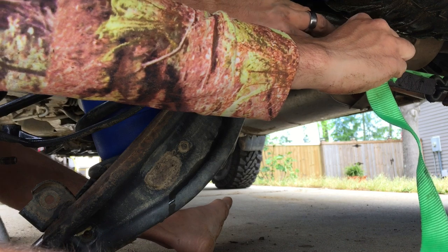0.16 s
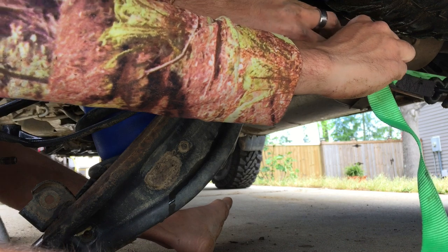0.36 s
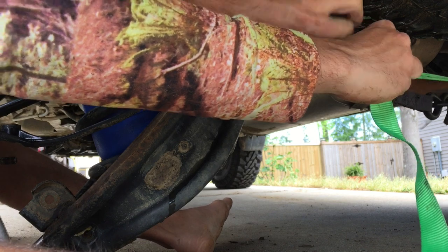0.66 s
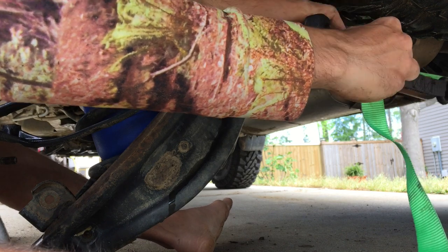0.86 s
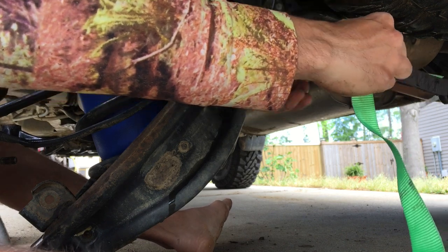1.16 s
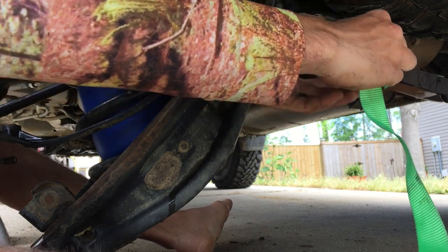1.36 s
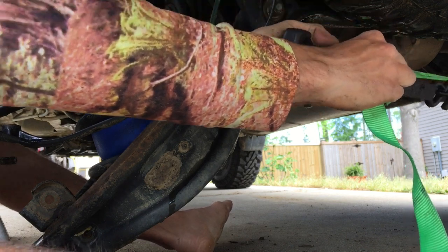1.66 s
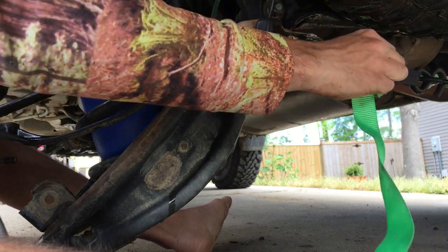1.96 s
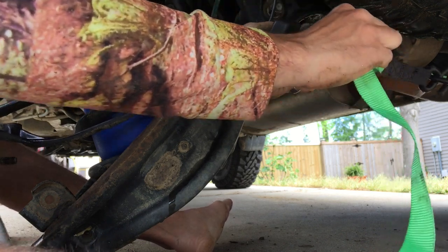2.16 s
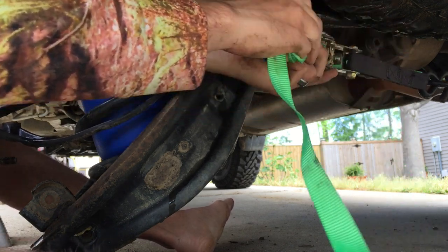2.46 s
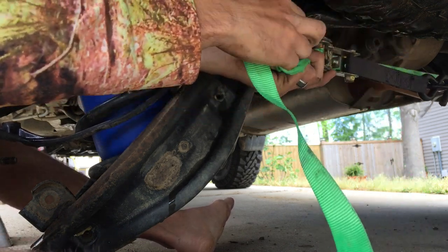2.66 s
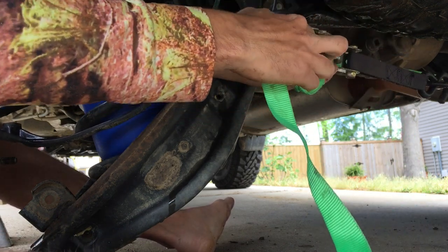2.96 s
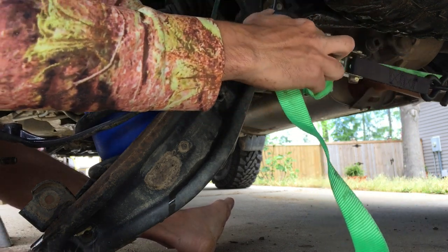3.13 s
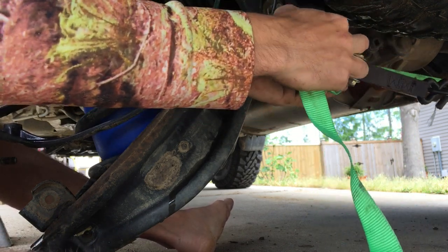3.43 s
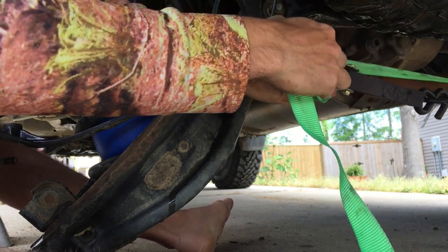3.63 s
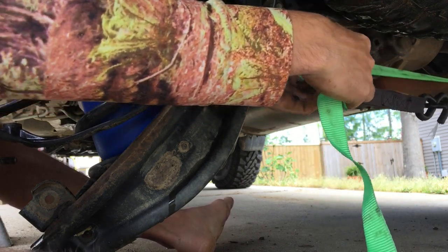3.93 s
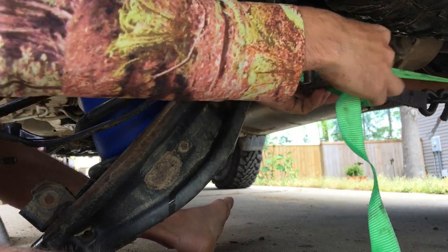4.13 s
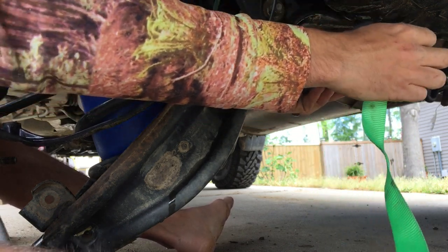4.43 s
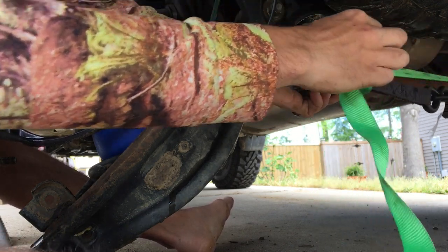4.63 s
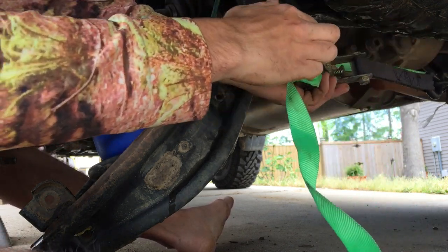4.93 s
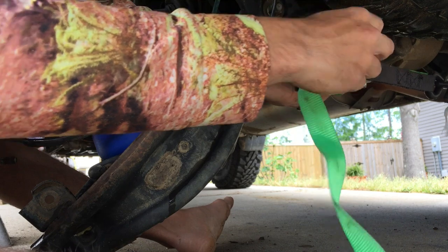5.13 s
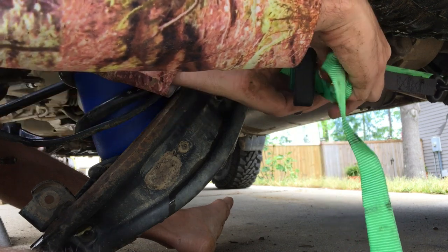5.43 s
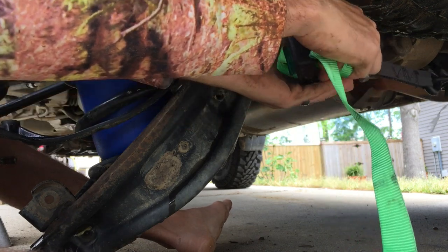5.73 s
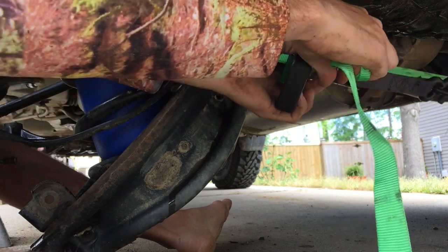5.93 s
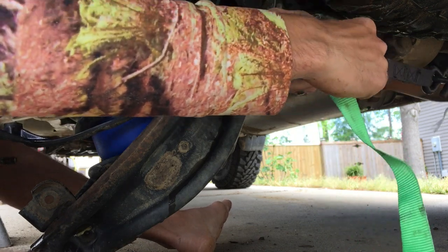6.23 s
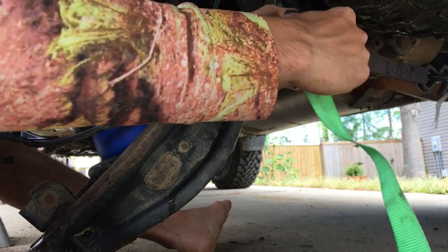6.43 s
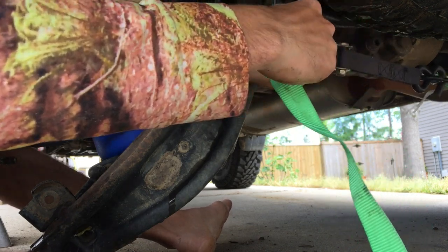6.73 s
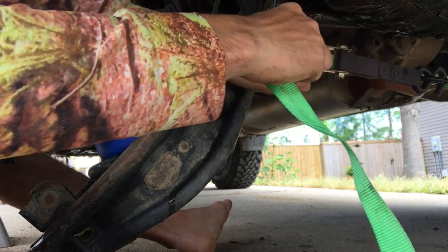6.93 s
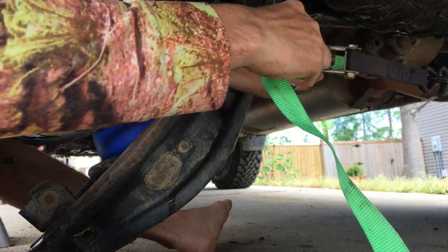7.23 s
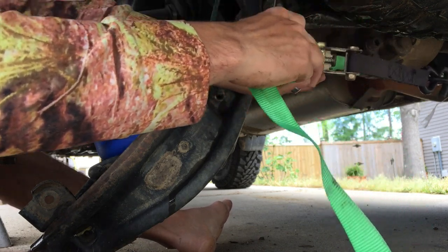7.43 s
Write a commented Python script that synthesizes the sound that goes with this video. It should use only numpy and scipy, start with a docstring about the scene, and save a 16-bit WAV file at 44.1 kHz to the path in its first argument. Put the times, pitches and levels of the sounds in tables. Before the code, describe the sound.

Over a steady low hum in an open garage, webbing rubs lightly as it is fed through a metal ratchet buckle. A short, groaning scuff comes early. Midway the strap creaks softly and the buckle clicks loudly three times, close and nearly dry. A second hollow scuff, small knocks and more rustling follow. A distant bird whistles faintly in the first half, and insects buzz softly later.

```python
"""Ratchet strap in an open garage

Under a vehicle, hands feed webbing through a steel ratchet buckle, whose modes ring as it ticks and
snaps three times. Stick-slip friction makes the webbing rustle and drives a hollow panel in two scuffs.
A fan hums, a thin whine hangs in the air, a bird whistles, insects buzz; a draught sways the microphone."""
import sys
import numpy as np
from scipy import signal
from scipy.fft import rfft, irfft, next_fast_len
from scipy.io import wavfile
from scipy.ndimage import map_coordinates

SR = 44100
rng = np.random.default_rng(int(sys.argv[2]) if len(sys.argv) > 2 else 0)


def int16_out(signal):
    """Quantize to a 16-bit WAV file."""
    q = np.round(np.clip(np.atleast_2d(signal).T, -1, 1) * 32767)
    wavfile.write(sys.argv[1], SR, q.astype(np.int16))


N = 334278

# the spring-loaded pawl snaps home: t/s, level/dB, brightness/(dB per register), favoured f/Hz,
# relative ring/dB, lead of the slip off the tooth/s, relative slip/dB, lever clack/dB
SNAPS = [(4.134, -19.5, -1.5, 3330, 10.5, 0.0013, -13, -22.5),
         (4.372, -15.5, 0.5, 5000, 0.5, 0.0029, -31, -16.5), (4.7526, -18, -0.8, 8400, 14.5, .005, -7, -28)]


def amp(db):
    """Decibels to amplitude ratio."""
    return 10 ** (np.asarray(db) / 20)


def unit(x):
    """Normalise to rms 1."""
    return x / np.sqrt(np.mean(x ** 2) + 1e-20)


def along(points, hz):
    """Interpolate (f/Hz, value) points on a logarithmic frequency axis."""
    f, v = np.transpose(points)
    return np.interp(np.log(hz + 1e-3), np.log(f), v)


def curve(points):
    """Interpolate (t/s, value) points linearly, one value per sample."""
    return np.interp(np.arange(N) / SR, *np.transpose(points))


def wobble(rate):
    """Smooth random modulation with `rate` knots a second."""
    knots = rng.standard_normal(int(N * rate / SR) + 4)
    return map_coordinates(knots, [np.arange(N) * rate / SR])


def filtered(x, response):
    """Linear filtering: multiply the spectrum by a frequency response."""
    m = next_fast_len(len(x) + SR // 4)
    return irfft(rfft(x, m) * response(np.fft.rfftfreq(m, 1 / SR)), m)[:len(x)]


def coloured(x, spectrum):
    """Spectral shaping by (f/Hz, level/dB) points, at rms 1."""
    return unit(filtered(x, lambda hz: amp(along(spectrum, hz))))


def noise(spectrum):
    """Coloured Gaussian noise of rms 1."""
    return coloured(rng.standard_normal(N), spectrum)


def slips(rate, size=N):
    """A Poisson train of `rate` impulses a second, at rms 1."""
    return unit((rng.random(size) < rate / SR) * rng.standard_normal(size))


def phase(hz):
    """Phase as the time integral of frequency."""
    return 2 * np.pi * np.cumsum(hz) / SR


def add(track, s, sound):
    """Superpose a sound on the track at time s."""
    part = track[max(round(s * SR), 0):][:len(sound)]
    part += sound[:len(part)]


def echo(x, decay, size):
    """Reverberation: convolution with a diffuse tail of unit energy, decaying by (f/Hz, T60/s) points."""
    hz, t, z = signal.stft(rng.standard_normal(size), SR, nperseg=128)
    tail = signal.istft(z * amp(-60 * t / along(decay, hz)[:, None]), SR, nperseg=128)[1]
    tail = np.pad(tail / np.linalg.norm(tail), (SR // 500, 0))
    return signal.fftconvolve(x, tail)[:len(x)]


def resonances(modes, f):
    """Complex response of damped resonators (f/Hz, bandwidth/Hz, level/dB), alternating in sign."""
    return sum((-1) ** k * amp(db) * 1j * f * width / (hz * hz - f * f + 1j * f * width)
               for k, (hz, width, db) in enumerate(modes))


def focus(f, hz, db_per_octave):
    """A response that falls at a constant slope on both sides of hz."""
    return amp(-db_per_octave * np.abs(np.log2((f + 1) / hz)))


def fan(waver_hz=2.4):
    """Partials of the fan and other machines hum under slight amplitude and frequency modulation."""
    partials = [(62.6, -66.5), (128.9, -58.5), (146.7, -59), (223, -70.5), (271, -72), (371.8, -68),
                (446.6, -69), (747, -75.5)]  # f/Hz, level/dB
    swell = [(0, -5.5), (2.5, 0), (6.5, 4.5), (7.58, 2)]  # slow swell, in full on the higher partials: t/s, level/dB
    swell_db, out = curve(swell), np.zeros(N)
    for hz, db in partials:
        level_db = db + swell_db * min(hz / 370, 1) ** 2 + 2.3 * wobble(5.1)
        out += amp(level_db) * np.sin(phase(hz + waver_hz * wobble(9)))
    return np.sqrt(2) * out


def whine(hz=3494, octave_db=-70):
    """An electrical tone of two harmonics: the fundamental swells and ebbs, the octave only wavers."""
    fundamental = [(2.35, -71), (2.55, -65.5), (2.75, -70.5), (5.3, -74), (5.5, -66.5), (6.6, -65.5),
                   (7.58, -71)]  # t/s, level/dB
    turn = phase(hz + 1.5 * wobble(6))
    harmonics = [(1, curve(fundamental)), (2, octave_db)]
    return np.sqrt(2) * sum(amp(db + 2 * wobble(7)) * np.sin(k * turn) for k, db in harmonics)


def off_arm(x, delay_s=.00125, sway_s=.00007, reflection=.47):
    """Comb filtering: a sound interferes with its reflection from the moving arm; rms 1."""
    lag = (delay_s + sway_s * wobble(2)) * SR
    return unit(x + reflection * map_coordinates(x, [np.arange(N) - lag]))


def insects(floor_db=-64, half_width_s=1):
    """Incoherent sources add in power: the chorus swells and ebbs above a constant floor."""
    crests = [(1.5, -73), (3.801, -67.5), (6.55, -59)]  # swells of the chorus: t/s, level/dB
    buzz = [(2000, -23), (4000, -11.5), (5800, 1.5), (7000, 4.5), (8200, 2.5), (10000, -5.5), (13000, -12),
            (16000, -46)]  # spectral density: f/Hz, relative level/dB
    t = np.arange(N) / SR
    swell_power = sum((amp(db) * np.exp(-((t - s) / half_width_s) ** 2)) ** 2 for s, db in crests)
    level_db = 10 * np.log10(amp(floor_db) ** 2 + swell_power)
    return amp(level_db + 1.2 * wobble(11)) * off_arm(noise(buzz))


def air(ambient_db=-48, draught_db=-28.5):
    """Broadband outdoor and fan noise, with the infrasonic pressure fluctuation of a draught."""
    # spectral densities: f/Hz, relative level/dB
    ambient = [(15, 9.5), (30, 4), (90, 1.5), (170, -2.5), (230, -9), (420, -12.5), (650, -19.5),
               (1200, -21.5), (1800, -21), (4000, -25.5), (7500, -31), (11000, -39), (16000, -42.5)]
    draught = [(.5, -12.5), (2, 9.5), (4, 3), (8, -10.5), (20, -63), (40, -62), (100, -120)]
    return amp(ambient_db) * noise(ambient) + amp(draught_db) * noise(draught)


def contacts(rebound_s=.0034, rebound_db=-11, rebound_bright_db=4.5):
    """Metal impacts as (t/s, favoured f/Hz, ring/dB, register levels/dB); a snap slips, hits, rebounds."""
    # t/s, level/dB, brightness/(dB per register), favoured f/Hz, relative ring/dB
    ticks = [(0.2822, -39, 1, 3320, 10.5), (3.566, -42.5, 4.5, 2860, 11), (3.729, -45.5, 11.5, 3700, 21.5),
             (4.0995, -36.5, -1, 1700, 5), (4.1145, -25.5, 5, 1700, -5), (7.4862, -50.5, -6, 2700, 7)]  # light ticks of the pawl
    knocks = [(3.2055, -43, -4, 1520, 18), (5.392, -51.5, 1, 4300, 0), (5.847, -41, 1, 1450, 4)]  # dull knocks of hook and frame
    # timbre of each kind: relative level/dB in the knock, clack, snap and sparkle registers
    snap_colour = [-13, -1, 1.5, -0.5]
    tick_colour = [-7, 0.5, -2, -14.5]
    knock_colour = [2, 4.5, 4, -8]
    blows = []
    for s, db, bright, hz, ring_db, lead, slip_db, _ in SNAPS:
        blows += [(s - lead, db + slip_db, bright, hz, ring_db + slip_db),
                  (s, db, bright, hz, ring_db),
                  (s + rebound_s, db + rebound_db, bright + rebound_bright_db, hz, ring_db)]
    register = np.linspace(-1.5, 1.5, 4)
    kinds = [(blows, snap_colour), (ticks, tick_colour), (knocks, knock_colour)]
    return [(s, hz, db + ring_db, db + np.array(colour) + bright * register)
            for rows, colour in kinds for s, db, bright, hz, ring_db in rows]


def buckle(crack_t60=.019, chatter_t60=.12, chatter_db=-26, fall_db_per_octave=27, scatter_db=-10.5):
    """Impact excitation: each contact cracks, rings the steel's modes and scatters off the underbody."""
    steel = [(1520, 1, .024), (1860, -4, .016), (2980, -3, .014), (3330, 0, .018), (4130, -3, .02),
             (4800, -8, .016), (6250, -7, .016), (8410, -1, .019), (9400, -9, .016), (14700, -6, .018)]  # modes damped by the hand: f/Hz, level/dB, T60/s
    underbody = [(500, 0.076), (4000, 0.075), (9000, 0.07), (15000, 0.045)]  # reverberation: f/Hz, T60/s
    # thud, knock, clack, snap and sparkle registers: filter order, low f/Hz, high f/Hz
    bands = [(3, 650, 1100), (3, 1400, 2100), (4, 2850, 4950), (5, 5300, 9400), (3, 10000, 15500)]
    filters = [signal.butter(order, edges, 'bandpass', fs=SR, output='sos') for order, *edges in bands]
    out, t = np.zeros(N), np.arange(SR // 5) / SR
    hz, mode_db, t60 = np.transpose(steel)[:, :, None]
    rise = 1 - np.exp(-t / .00045)
    attack_samples = np.sum(t < .003)
    for s, ring_hz, ring_db, colour_db in contacts():
        # modes far from the favoured frequency ring less
        drive_db = rng.normal(0, 1.5, hz.shape) - fall_db_per_octave * np.abs(np.log2(hz / ring_hz))
        turn = rng.uniform(0, 2 * np.pi, hz.shape)
        modes = amp(mode_db + drive_db - 60 * t / t60) * np.sin(2 * np.pi * hz * t + turn)
        hit = amp(ring_db) * modes.sum(axis=0) * rise
        crack = rng.standard_normal(len(t)) * amp(-60 * t / crack_t60)
        chatter = amp(chatter_db - 60 * t / chatter_t60) * slips(rate=900, size=len(t))  # loose parts
        # the frame thuds with the knock, as far as the gripping hand lets it move
        thud_db = min(colour_db[0] - 12, -41)
        for sos, db in zip(filters, [thud_db, *colour_db]):
            band = signal.sosfilt(sos, (crack + chatter) * rise)
            hit += amp(db + 1) * band / np.sqrt(np.sum(band ** 2) / attack_samples)
        add(out, s, hit + amp(scatter_db) * echo(hit, underbody, size=SR // 6))
    return out


def fibres(tick_t60=.012):
    """Friction of the weave: a soft hiss with fine slips, and now and then a fibre that ticks."""
    weave = [(100, -10.5), (300, 6), (1000, 6), (2000, 5.5), (4000, 4), (8000, 2), (11000, -4), (16000, -8)]  # spectral density: f/Hz, relative level/dB
    hiss = rng.standard_normal(N) + .8 * slips(rate=430)
    t = np.arange(SR // 50) / SR
    tick = amp(-60 * t / tick_t60) * rng.standard_normal(len(t))
    catches = unit(signal.fftconvolve(slips(rate=35), tick)[:N])
    return coloured(hiss + amp(-7) * catches, weave)


def webbing(level_db=-60, fade_s=.074):
    """Sliding friction gives a light, uneven rustle while the hands work."""
    spells = [(.55, 4.85), (5.4, 11)]  # handling: start t/s, end t/s
    t = np.arange(N) / SR
    busy = sum(np.tanh((t - start) / fade_s) - np.tanh((t - end) / fade_s) for start, end in spells) / 2
    return amp(level_db + 1.8 * wobble(20)) * busy * fibres()


def rubs_and_ticks():
    """Filtered noise bursts: rubs of the webbing and small ticks and knocks, each in its own register."""
    bursts = [(0.71, -56, 0.15, 8950), (1.55, -61, .03, 14000), (1.726, -56.5, 0.07, 2980),
              (1.855, -59, 0.051, 12000), (2.084, -54, 0.048, 7650), (2.49, -56.5, .07, 6470),
              (2.902, -48.5, .01, 2800), (3.243, -57, .08, 2000), (3.702, -49, .007, 3000),
              (3.971, -51, 0.0043, 14000), (4.05, -45.5, .005, 9000), (4.338, -51.5, 0.03, 3000),
              (4.71, -52.5, 0.057, 3020), (5.544, -47.5, .006, 12600), (5.843, -42, 0.0061, 1400),
              (5.913, -45, .01, 1400), (5.994, -52, 0.0044, 950), (6.139, -55.5, 0.016, 4040),
              (6.48, -53, 0.017, 6000), (6.73, -54.5, .012, 7000), (6.863, -55, 0.014, 1790),
              (7.469, -47.5, 0.0044, 2000)]  # t/s, level/dB, half-width/s, favoured f/Hz
    out, t = np.zeros(N), np.arange(SR // 2) / SR - .25
    texture = fibres() * amp(2.5 * wobble(110))
    for s, db, half, hz in bursts:
        burst = np.roll(texture, -round(s * SR))[:len(t)]
        burst = filtered(burst, lambda f: focus(f, hz, db_per_octave=6))
        add(out, s + t[0], amp(db) * np.exp(-(t / half) ** 2) * unit(burst))
    return out


def scuffs(rasp_db=-22, ring_db=-7):
    """Forced vibration: bursts of slips drive the resonances of a hollow panel, which rings on."""
    catches = [(0.683, -53.5, 0.0087, 1500), (0.733, -42, 0.021, 483), (0.772, -36.5, 0.0063, 420),
               (0.789, -42, 0.011, 700), (0.828, -38, 0.011, 507), (0.849, -43.5, 0.011, 1530),
               (0.872, -43, 0.0049, 900), (5.341, -44.5, 0.0021, 1100), (5.367, -42.5, 0.0076, 1490),
               (5.399, -39, 0.0087, 2250), (5.438, -39.5, 0.029, 486), (5.456, -44, 0.0073, 1960)]  # t/s, level/dB, Gaussian width/s, favoured f/Hz
    # resonances: f/Hz, bandwidth/Hz, level/dB
    panel = [(140, 46, 12.5), (354, 112, 4.5), (713, 120, 1), (1040, 135, -1.5), (1286, 56, 1),
             (1587, 115, -3.5), (2270, 530, -9), (3070, 200, -6)]  # driven by the touch
    lingering = [(690, 190, 0.5), (1150, 330, -4), (1550, 160, 0), (2450, 190, 1), (3070, 200, 6),
                 (4420, 120, 25)]  # ringing after it
    out, t = np.zeros(N), np.arange(SR // 4) / SR - .1
    rasp = lambda f: amp(rasp_db) * (f / (f + 300)) / (1 + (f / 7000) ** 2)
    for s, db, width, hz in catches:
        stroke = np.exp(-(t / width) ** 2 / 2)
        grip = stroke * slips(rate=1200)[:len(t)]
        rub = filtered(grip, lambda f: (resonances(panel, f) + rasp(f)) * focus(f, hz, db_per_octave=5))
        add(out, s + t[0], amp(db) * rub * np.linalg.norm(stroke) / np.linalg.norm(rub))
    ring = echo(out, decay=[(750, 1.0), (4500, .5)], size=SR)
    return out + amp(ring_db) * filtered(ring, lambda f: resonances(lingering, f))


def groans(roughness=.06):
    """Frictional judder sounds one panel resonance at a time, as a tone of randomly modulated pitch."""
    judders = [(0.74, -36.5, 0.012, 454), (0.769, -33, .005, 311.3), (0.87, -36.5, 0.0074, 720),
               (5.38, -40.5, 0.019, 402.5), (5.422, -34.5, 0.024, 410), (5.455, -44, .032, 774)]  # t/s, level/dB, half-width/s, f/Hz
    t = np.arange(N) / SR
    turn = phase(1 + roughness * wobble(140))
    return sum(amp(db) * np.exp(-((t - s) / half) ** 2) * np.sin(hz * turn) for s, db, half, hz in judders)


def bird(first_s=1.155, period_s=.327, count=9, level_db=-66, early_db=-3, echo_gain=2.2):
    """A far bird repeats a frequency sweep, a downward flick and glide, blurred by scattering in trees."""
    length_s, flick_s = .15, .013
    base_hz, flick_hz, glide_hz = 2440, 2400, 680
    out, t = np.zeros(N), np.arange(int(length_s * SR)) / SR
    swell = np.sin(np.pi * t / length_s)
    sweep = base_hz + flick_hz * np.exp(-t / flick_s) - glide_hz * t / length_s
    for k in range(count):
        pitch = sweep * (1 + .015 * rng.standard_normal())
        call_db = early_db * .5 ** k + 1.2 * rng.standard_normal()  # the first few are softer
        call = np.pad(amp(call_db) * swell * np.sin(phase(pitch)), (0, SR // 2))
        scattered = echo(call, decay=[(2000, .36), (4000, .3)], size=SR // 2)
        add(out, first_s + k * period_s, call + echo_gain * scattered)
    return amp(level_db) * out


def bumps(cycles=.97):
    """Padded impacts of arm and hand: Gaussian wave packets a few cycles long."""
    touches = [(1.26, -38, 88), (1.726, -33.5, 127), (5.847, -37.5, 590), (6.323, -36.5, 85)]  # t/s, level/dB, f/Hz
    t = np.arange(N) / SR
    return sum(amp(db) * np.exp(-((t - s) * hz / cycles) ** 2) * np.sin(2 * np.pi * hz * (t - s))
               for s, db, hz in touches)


def tightening(centre_s=4.06, half_width_s=.33, level_db=-56.5):
    """Stick-slip under tension: fibres creak in soft clusters as the webbing takes up load on the spool."""
    load = np.exp(-((np.arange(N) / SR - centre_s) / half_width_s) ** 2)
    clusters = amp(5.5 * wobble(70))
    creak = (slips(rate=300) + .2 * rng.standard_normal(N)) * clusters
    return amp(level_db) * load * coloured(creak, [(2000, -17), (8000, -6), (14000, 5)])


def lever(rise_s=.0003):
    """Damped free vibration: each snap jolts the lever into a short, hollow clack."""
    modes = [(330, -17, .02), (1560, 0, .021), (1930, 2.5, .018)]  # f/Hz, level/dB, T60/s
    out, t = np.zeros(N), np.arange(SR // 20) / SR
    clack = sum(amp(db - 60 * t / t60) * np.sin(2 * np.pi * hz * t) for hz, db, t60 in modes)
    clack *= 1 - np.exp(-t / rise_s)
    for s, *_, clack_db in SNAPS:
        add(out, s, amp(clack_db) * clack)
    return out


def scene():
    """Direct and reverberant sound superpose: the buckle is nearly dry, the scuffs carry into the garage."""
    garage = [(200, 0.56), (400, 0.48), (780, 0.29), (3000, 3.1), (10000, 0.77)]  # reverberation: f/Hz, T60/s
    clicks = buckle() + lever()
    panel = scuffs() + groans()
    room = echo(amp(-39) * clicks + amp(-9) * panel, garage, size=SR)
    strap = webbing() + rubs_and_ticks() + tightening()
    return (clicks + panel + room + strap + bumps() + fan() + whine() + bird() + insects() + air())[None]


def record(dry, cutoff_hz=16100, transition_hz=900):
    """Hard clipping at full scale, then a low-pass band limit."""
    clipped = np.clip(dry[0], -1, 1)
    return filtered(clipped, lambda hz: np.clip((cutoff_hz - hz) / transition_hz + .5, 0, 1))[None]


dry = scene()
out = record(dry)
int16_out(out)
```